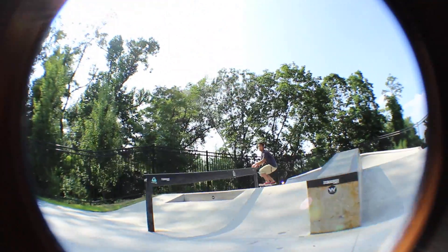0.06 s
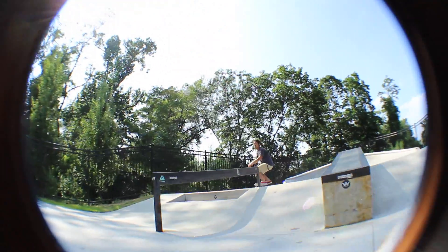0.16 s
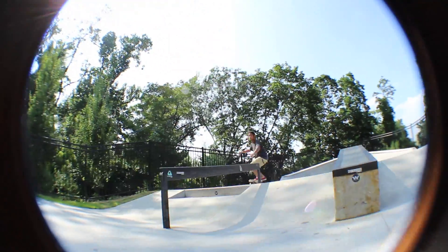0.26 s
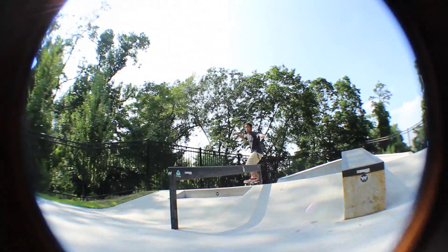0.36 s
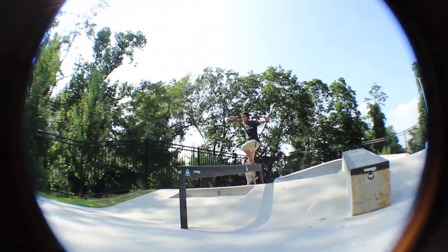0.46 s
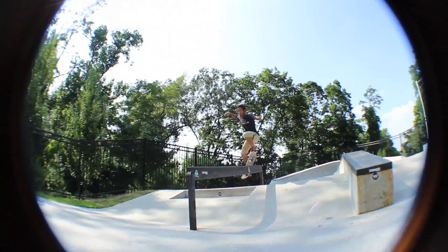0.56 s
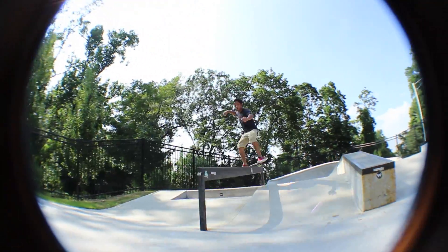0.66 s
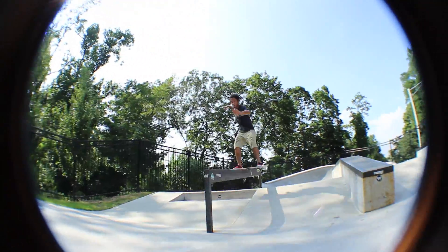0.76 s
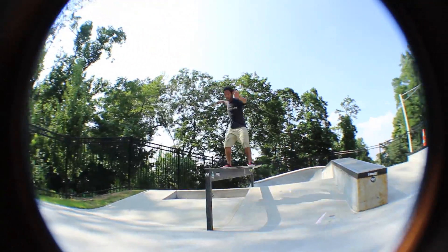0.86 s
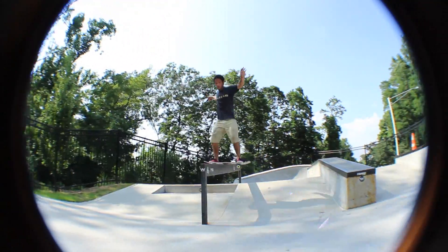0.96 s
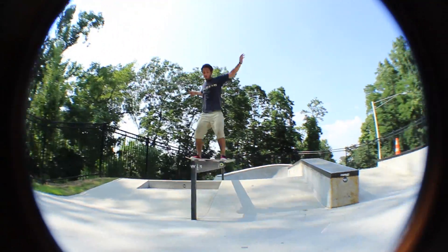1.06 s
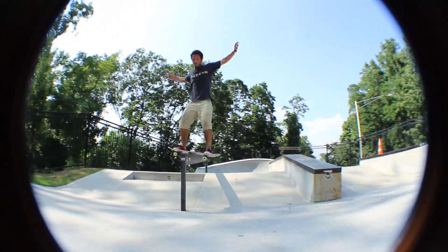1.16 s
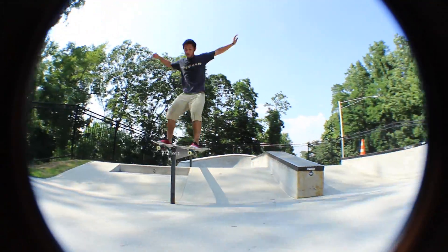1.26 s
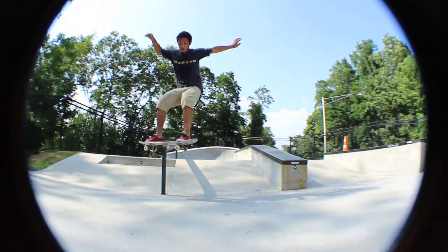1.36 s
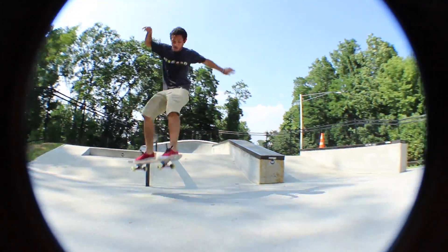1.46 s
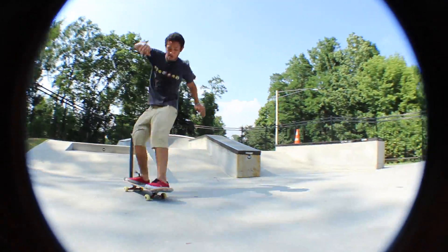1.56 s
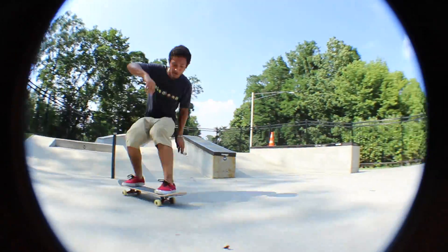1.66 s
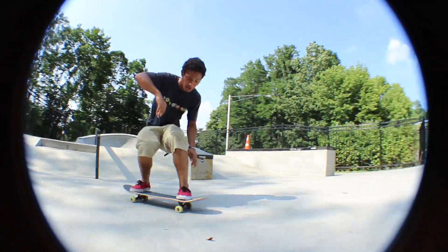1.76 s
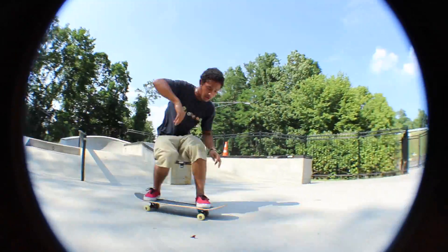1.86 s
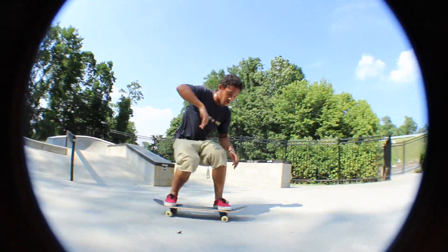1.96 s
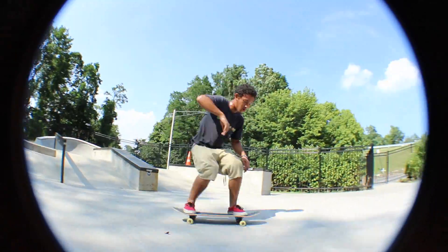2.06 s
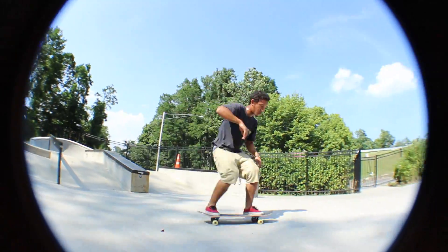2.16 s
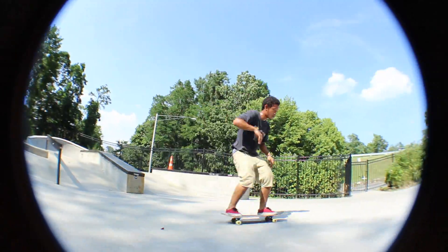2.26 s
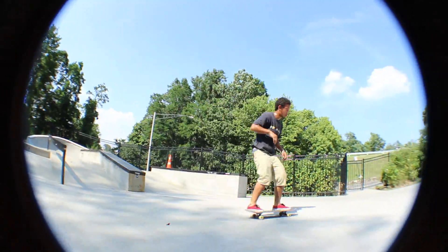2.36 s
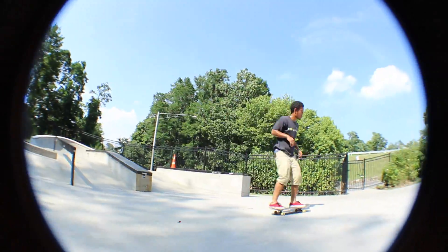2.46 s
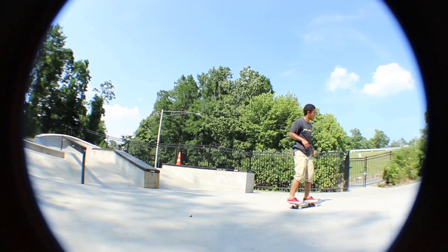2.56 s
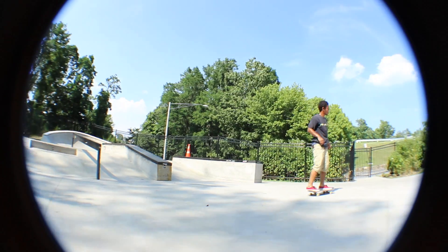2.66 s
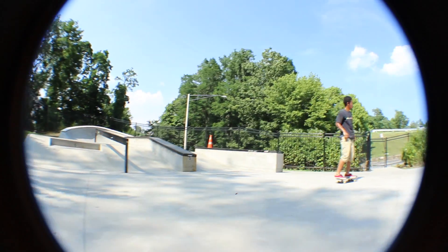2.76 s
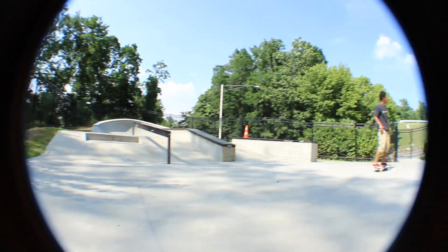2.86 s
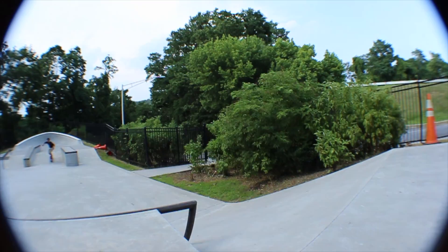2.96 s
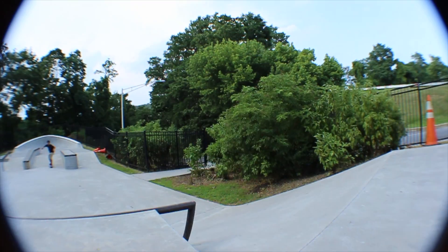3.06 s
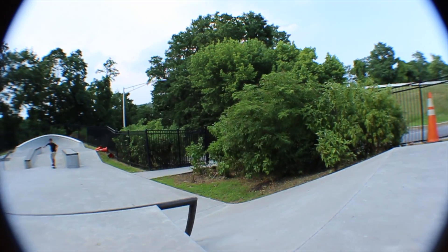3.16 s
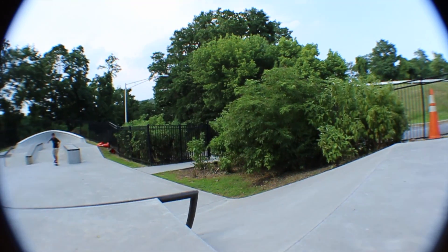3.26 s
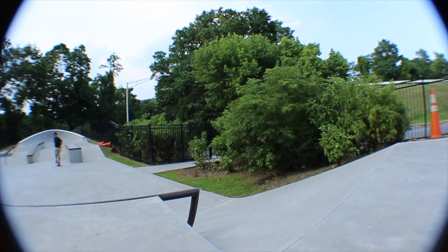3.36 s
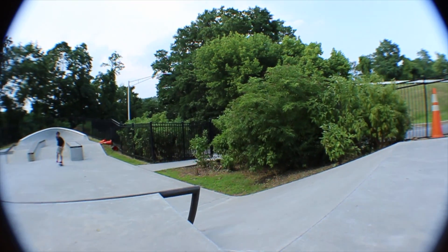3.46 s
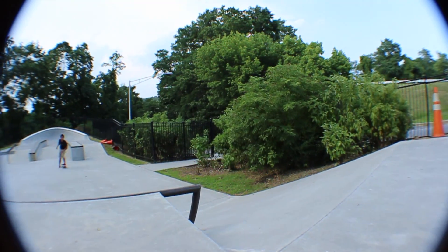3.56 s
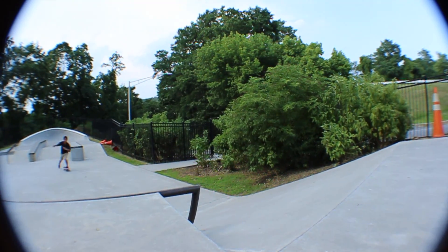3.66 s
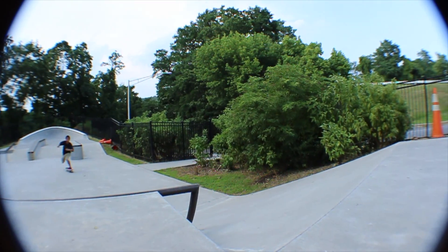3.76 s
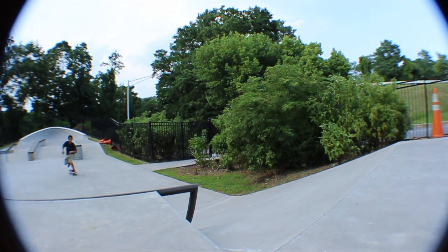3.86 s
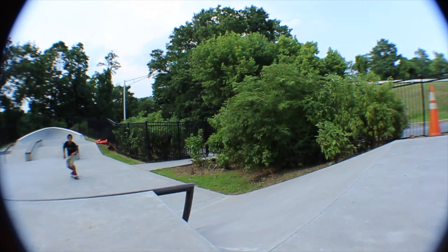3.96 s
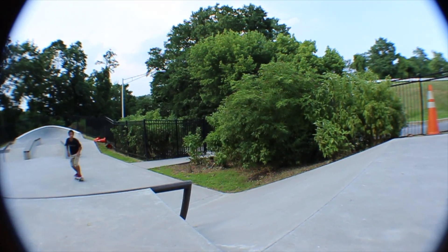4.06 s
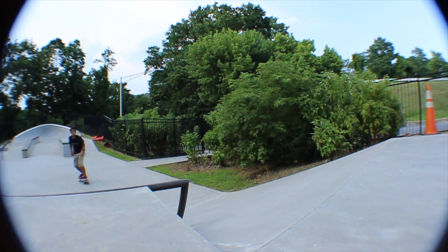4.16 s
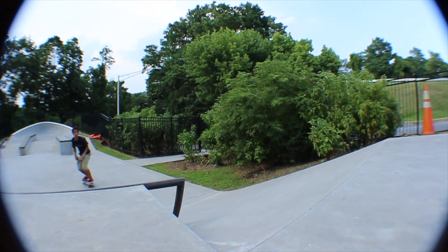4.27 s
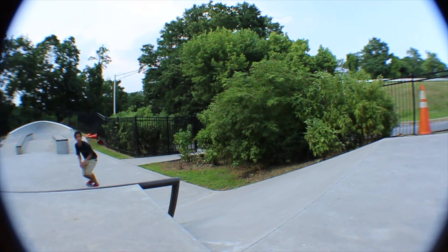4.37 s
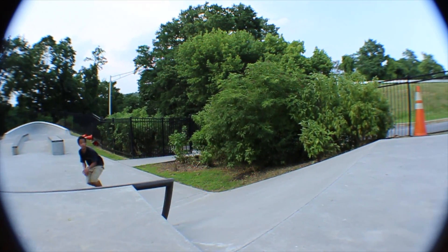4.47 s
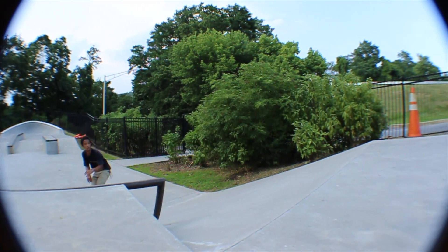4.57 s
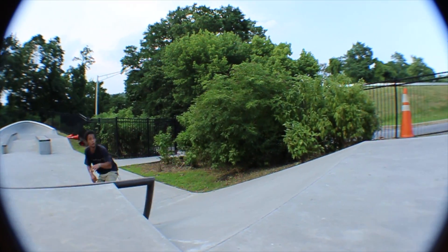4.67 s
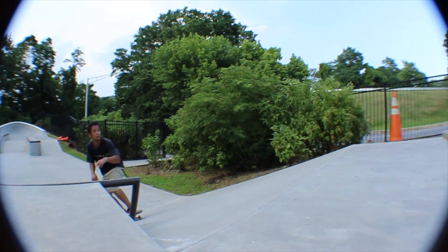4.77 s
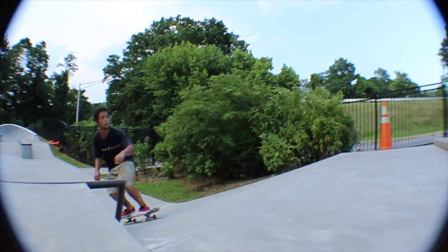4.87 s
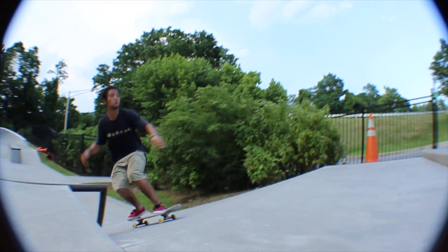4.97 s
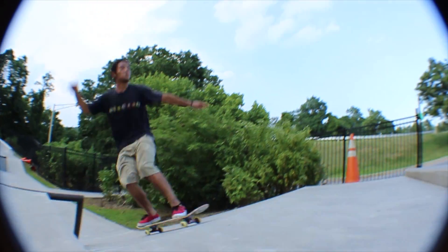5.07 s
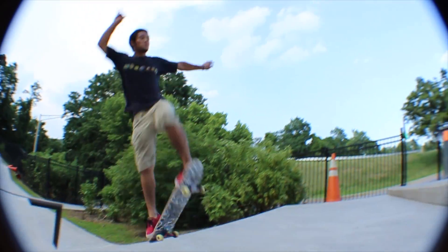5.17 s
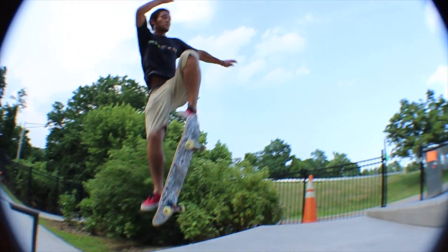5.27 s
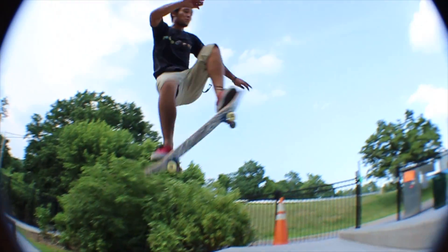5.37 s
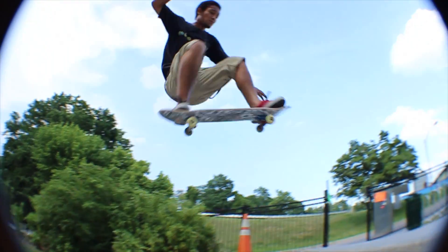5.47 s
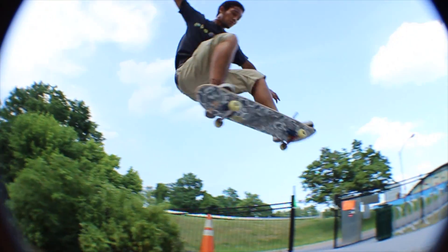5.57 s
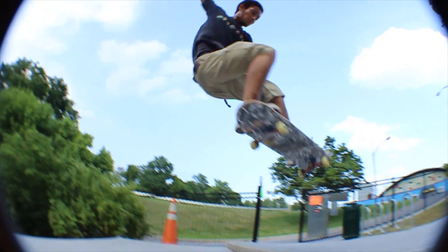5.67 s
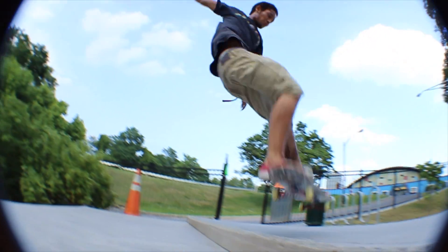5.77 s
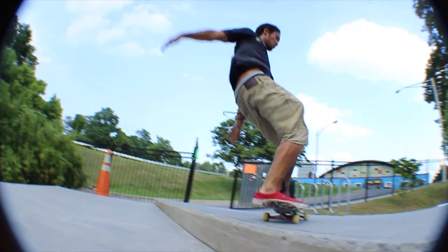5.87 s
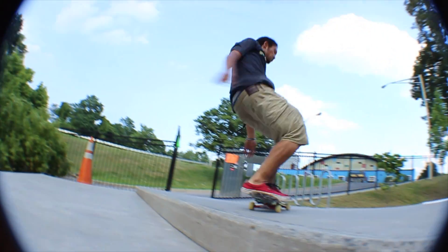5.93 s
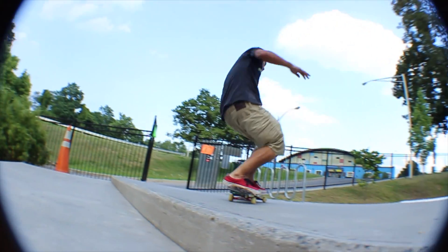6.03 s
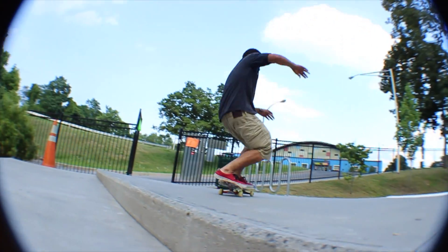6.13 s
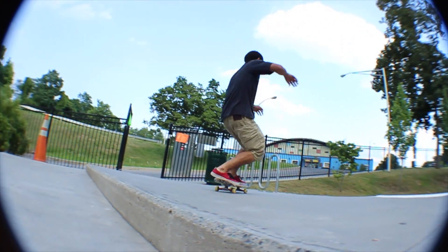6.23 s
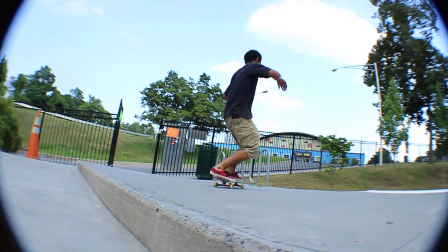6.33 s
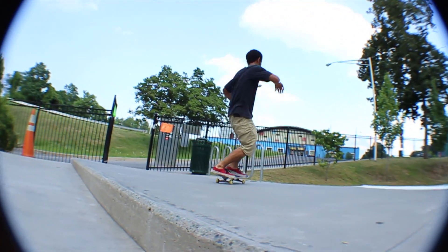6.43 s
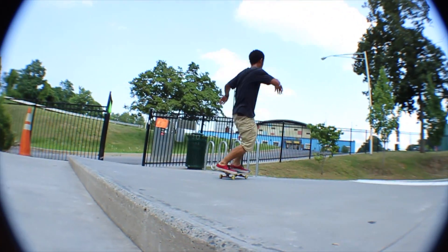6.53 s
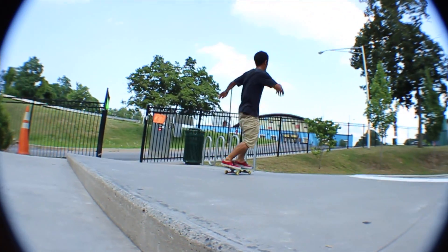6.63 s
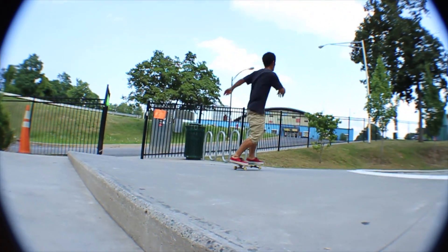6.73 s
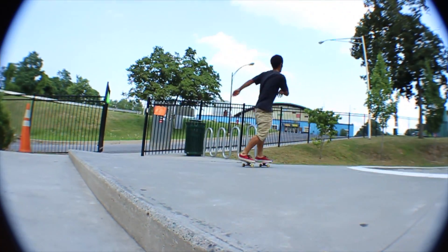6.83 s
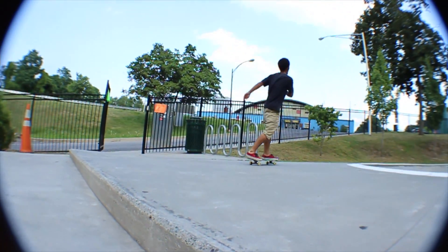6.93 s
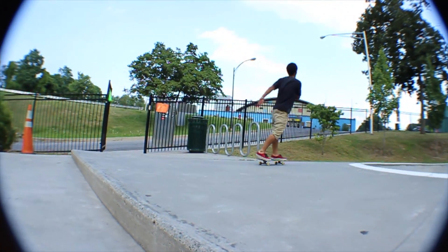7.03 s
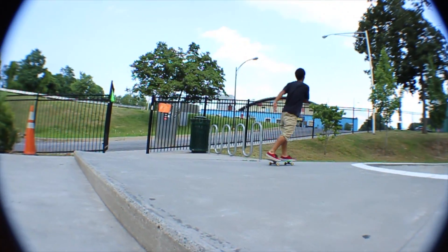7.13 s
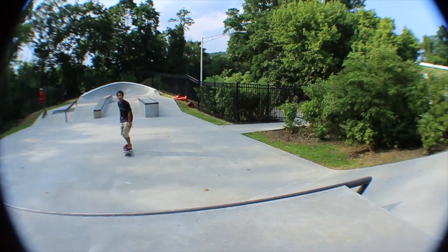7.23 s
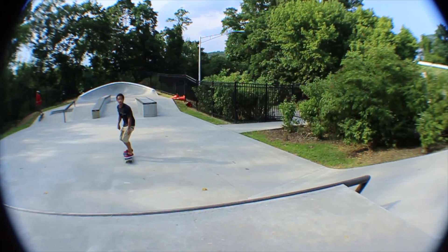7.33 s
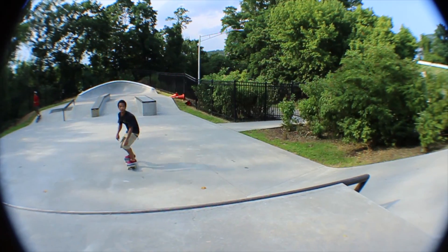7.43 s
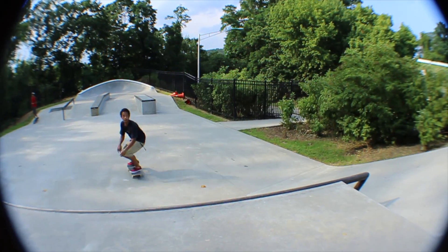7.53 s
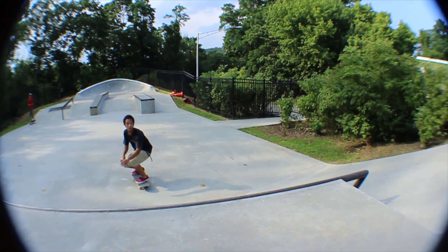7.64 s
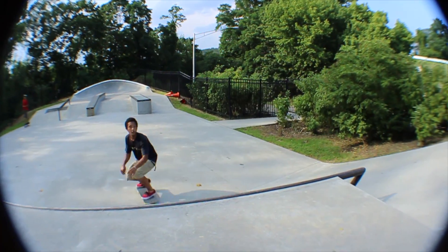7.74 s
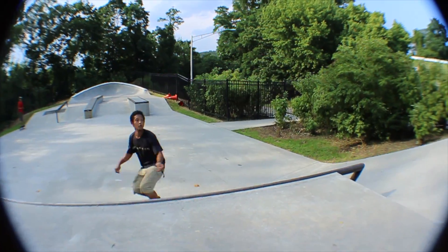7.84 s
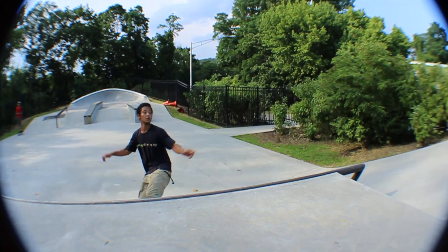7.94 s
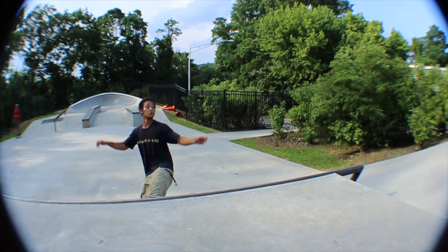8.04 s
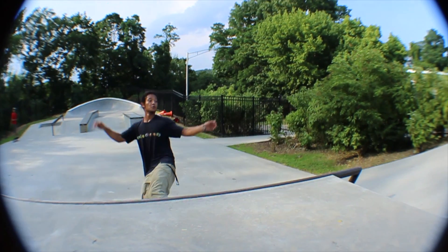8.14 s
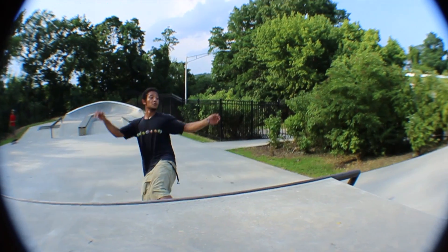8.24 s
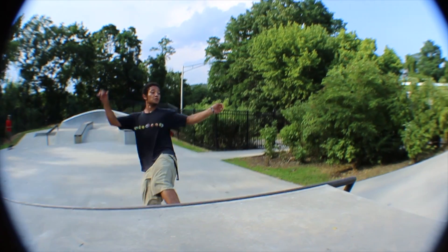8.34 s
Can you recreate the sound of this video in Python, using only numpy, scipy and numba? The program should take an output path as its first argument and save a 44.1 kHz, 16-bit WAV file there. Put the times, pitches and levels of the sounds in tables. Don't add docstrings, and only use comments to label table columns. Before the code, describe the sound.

Close, gritty skateboard rolling over faint low traffic and wind: wooden deck drumming, bearings hissing, small stones ticking. First a pop, rail knock, short metallic scrape and violent landing clack; next a longer approach, sharp pop, airy gap and distorted heavy slam with quiet rolling after; last a brief roll with light knocks. Sudden cuts separate the passes, and automatic gain ducks the background after impacts.

```python
import sys
import numpy as np
from scipy import signal
from scipy.io import wavfile
from scipy.ndimage import uniform_filter1d
from numba import njit

SR = 44100
rng = np.random.default_rng(int(sys.argv[2]) if len(sys.argv) > 2 else 0)


def makeup_ratio(level_db):
    decades = np.asarray(level_db, float) / 20
    return 10 ** decades


def unload_wav(signal):
    wavfile.write(
        sys.argv[1],
        SR,
        np.round(np.clip(np.atleast_2d(signal).T, -1, 1) * 32767).astype(np.int16),
    )


N = 370440

SCENE_CHANGES = [
    2.97,
    7.243,
]

# time in seconds,
# nearness in dB, weight on the deck in dB, bite of the surface in dB.
SLIDE = [
    (0, -32, 2.5, 1.5),
    (.45, -29.5, 3, 3),
    (.54, -27.5, 0.5, 7),
    (.62, -25.5, 0, 6),
    (.8, -29.5, 5.5, 12),
    (1.06, -31, 0.5, 8),
    (1.2, -30, 1.5, 5),
    (1.42, -30, 1.5, 12.5),
    (1.6, -30.5, 2, 12.5),
]
RIDE_AWAY = [
    (1.65, -25, -1.5, 15),
    (2.0, -27, -2, 0.5),
    (2.47, -28.5, -0.5, 2),
    (2.72, -31, 1, 2),
    (2.86, -38.5, 6.5, -3),
    (2.95, -33.5, 4, -12),
]
APPROACH = [
    (2.98, -31, 0, 4.2),
    (3.14, -28, -6.5, 7.6),
    (3.3, -27, 0.5, 1),
    (3.61, -26, -5, 12.8),
    (3.8, -31, 4, 12),
    (4.25, -27, -5, 10),
    (4.49, -29.5, 5, 4.6),
    (5.0, -34.5, 8.5, 23.2),
    (5.22, -27.5, -0.5, 15),
]
JUMP = [
    (5.27, -20, -4, 16),
    (5.4, -30.5, -2, 25.6),
    (5.75, -23, -9, 17.5),
    (5.86, -24.5, -4.5, 15.6),
]
LANDED = [
    (5.909, -30.5, 2.5, 14),
    (6.2, -28, -6.5, -7),
    (6.59, -30, 0.5, 2.5),
    (6.81, -29.5, -5.5, -2.5),
    (6.9, -31, -1, -8),
    (7.235, -35, -1.5, -11),
]
RUN_UP = [
    (7.25, -27.5, -2.5, 10),
    (7.39, -29.5, -12, 13),
    (7.63, -27.5, -0.5, 13),
    (7.8, -30.5, 3.5, 10.6),
    (7.9, -35, 5, 2.8),
]

# start in seconds, deck ring in Hz,
# wheel ring in Hz, bearing ring in Hz.
STANCES = [
    (0, 512, 1140, 3730),
    (.56, 653, 1280, 3900),
    (1.15, 572, 1165, 3950),
    (1.62, 594, 1410, 3760),
    (2.97, 688, 1130, 4200),
    (3.9, 584, 1180, 4100),
    (5.25, 660, 1350, 3630),
    (5.88, 663, 1370, 3730),
    (7.25, 530, 1346, 4270),
    (7.5, 508, 1276, 5280),
]

# centre in Hz, width in Hz, level in dB.
WHEELS = [
    (909, 394, 5),
    (1200, 180, 3),
    (1550, 604, 5),
    (1870, 2200, -9),
]
# centre in Hz, width in Hz, level in dB.
GRIT = [
    (7340, 8000, 15),
    (11400, 7800, 16),
    (13280, 7800, 13),
    (16270, 1900, -1),
]

# start in seconds, peak in dB, ring in Hz,
# crack in dB, decay by 60 dB in seconds.
SNAPS = [
    (0.5564, -16, 3900, 0, 0.009),
    (0.5575, -15.5, 900, -3, 0.027),
    (0.7558, -19, 2260, 2, 0.009),
    (0.7568, -16, 1000, -7, 0.018),
    (0.757, -17, 650, -10, 0.022),
    (1.6062, -7, 1000, -0.5, 0.026),
    (1.611, -17, 1900, -6.5, 0.04),
    (1.607, -8, 620, -20, 0.035),
]
SLAMS = [
    (5.2385, -11.5, 1144, 1.5, 0.026),
    (5.87, -7, 2640, -3, 0.0051),
    (5.8712, -1.5, 650, -15.5, 0.034),
    (5.8765, -8, 564, -5.5, 0.025),
]
# start in seconds, peak in dB, ring in Hz,
# crack in dB, decay by 60 dB in seconds.
KNOCKS = [(0.713, -31, 1880, -23.5, 0.023), (0.774, -22.5, 654, -10, 0.061), (1.619, -11, 1500, -6, 0.01),
          (1.626, -9, 1304, -14, 0.011), (1.6415, -21, 1400, 2, 0.016), (1.643, -22, 900, -8, 0.022),
          (1.6495, -27, 950, -10, 0.012), (1.613, -12, 800, -8, .02), (1.629, -21, 2900, -10, .016),
          (3.1522, -13, 900, -30, 0.011), (3.2042, -12, 1040, -32, 0.014), (4.745, -14, 1160, -38, 0.031),
          (5.0705, -13.5, 660, -22, 0.027), (5.123, -15.5, 673, -10, 0.018), (5.135, -21, 1000, -10, 0.03),
          (5.132, -19, 1500, -6, 0.03), (5.2405, -15, 5090, -20, 0.03), (5.883, -4, 513, -8, 0.0048),
          (5.873, -8, 1150, -15, 0.025), (5.886, -16, 638, -6.5, 0.015), (6.3322, -24, 1550, -20, 0.02),
          (6.1245, -30, 1650, -20, 0.014), (6.217, -30, 1400, -25, 0.015), (6.252, -34, 1800, -15, .015),
          (6.6535, -16, 1500, -30, 0.023), (6.8332, -9, 1590, -29, 0.019),
          (6.8372, -14.5, 1250, -30, 0.036), (6.9025, -20, 1640, -25, 0.026),
          (7.364, -16.5, 1260, -26, 0.049), (7.448, -20, 494, -35.5, 0.049), (7.856, -17, 750, -20, 0.04),
          (7.858, -19, 1250, -12, 0.03), (7.795, -17, 800, -20, .02), (7.915, -15, 493, -32, 0.035),
          (7.9152, -13, 1250, -28, 0.027), (7.92, -17, 1280, -25, 0.012), (0.751, -28, 3440, -3, 0.03),
          (0.5495, -18, 1420, -25, 0.018), (5.952, -38.5, 1200, -12, 0.04), (6.228, -34.5, 1900, -25, 0.02),
          (7.888, -22, 1110, -30, 0.017), (4.748, -20, 453, -30, 0.031), (3.1548, -10, 1100, -35, 0.014),
          (5.244, -14.5, 1350, -12, 0.033)]
# pitch in Hz, level in dB, decay by 60 dB in seconds.
RAIL = [
    (345, -6, 1.5),
    (646, 0, 2),
    (975, -8, .6),
    (1740, -8, .4),
    (2300, -11, .6),
    (2930, -10, .33),
    (3135, -4, .25),
    (3975, -3, .25),
]
# start in seconds, peak in dB, bright click in Hz, wheel ring in dB.
STONES = [(.5566, -12, 11500, -20), (.5605, -28, 6000, -20), (.7562, -21, 7000, -20), (1.166, -32, 3800, 2),
          (1.395, -25, 4000, 2), (1.402, -23, 6000, 3), (2.9725, -40, 11900, -20), (3.095, -40, 4000, -6),
          (3.1515, -32, 5000, -15.5), (3.17, -44, 11000, -20), (3.2055, -41, 6000, 0),
          (3.649, -22, 3500, 4.5), (4.751, -36, 5000, 5), (5.1243, -18, 16500, -8), (5.134, -26, 16000, -5),
          (5.1246, -27, 7000, 0), (5.138, -26, 9000, 3), (5.158, -38, 7000, -5), (5.214, -35, 8000, -10),
          (5.221, -35, 9000, -10), (6.837, -33, 9000, -10), (5.896, -40, 10000, -10),
          (6.1245, -43, 8000, 0), (6.2165, -53, 9000, 5), (4.822, -36, 10000, -10),
          (6.8335, -24, 4600, -10), (6.251, -48, 7000, 5), (6.263, -49, 8500, 5), (6.289, -47, 10000, 12),
          (6.3322, -44, 13000, 16), (6.338, -43, 15000, 5), (6.402, -44, 13000, 0), (6.556, -42, 8000, 0),
          (6.566, -34, 9000, 7), (6.611, -38, 13000, -6), (6.653, -29, 8000, 10), (6.683, -34, 7000, -2),
          (6.6996, -34, 7000, -2), (6.662, -37, 10000, 0), (6.54, -42, 12000, 0), (6.46, -42, 6000, 0),
          (6.718, -35, 8000, 0), (6.768, -36, 6500, 0), (6.8328, -19.5, 6500, -7), (6.842, -33, 11000, 2),
          (6.9024, -33, 10000, 9), (7.156, -32, 9000, 3), (7.855, -30, 7000, 0), (7.9155, -37, 5500, -3),
          (1.6203, -12, 9050, -4), (1.628, -26, 8000, 0), (1.6418, -21, 6500, -6)]

# start in seconds, end in seconds, pitch in Hz, level in dB.
HUMS = [(3.62, 3.92, 334, -35.5), (3.38, 3.55, 340, -36), (4.55, 4.7, 1140, -33), (4.55, 4.72, 1500, -36),
        (4.8, 4.86, 700, -31), (4.9, 5.03, 760, -35), (3.9, 4.35, 330, -40), (4.83, 5.06, 530, -31),
        (3.65, 4.29, 606, -30.5), (4.4, 4.56, 590, -31), (4.54, 4.78, 520, -31), (4.44, 4.78, 1159, -30.5),
        (4.2, 4.36, 1520, -35), (4.95, 5.15, 690, -39), (5.68, 5.83, 980, -38), (7.22, 7.3, 455, -34),
        (7.42, 7.6, 505, -32), (7.54, 7.93, 504.7, -28), (7.723, 7.87, 1152, -29.5), (7.3, 7, 10000, -66)]
# start in seconds, end in seconds, pitch in Hz, level in dB.
RASPS = [(.1, .56, 3900, -54), (.57, .66, 3600, -49), (1.2, 1.45, 3900, -51), (1.46, 1.61, 3650, -46),
         (2.97, 3.14, 1750, -37), (1.72, 2.3, 1900, -54), (2.1, 2.8, 1900, -44), (3.452, 3.72, 1790, -36),
         (3.448, 5.1, 5420, -47.5), (6.243, 6.83, 1550, -46), (7.23, 7.453, 5750, -44),
         (7.4, 7.83, 5440, -42), (7.62, 7.9, 763, -31)]
# start in seconds, end in seconds, centre in Hz, level in dB.
SCRAPES = [(.76, .92, 2300, -43), (.78, .95, 3200, -50), (.565, .63, 5500, -54), (.76, .79, 4000, -36.5),
           (4.16, 4.37, 1700, -31.5), (2.97, 3.15, 1050, -36), (5.08, 5.26, 5200, -52),
           (1.15, 1.6, 9400, -53), (1.2, 1.604, 1810, -37.5), (4.25, 4.7, 216, -33.5),
           (4.98, 5.17, 212, -29.5), (5.45, 5.58, 1490, -41.5), (5.66, 5.92, 1550, -33.5),
           (6.24, 6.85, 3260, -53), (7.29, 7.47, 1870, -28.5), (7.5, 7.8, 189, -32.5),
           (5.28, 5.62, 300, -48), (5.74, 5.88, 1800, -34), (1.645, 1.71, 2000, -50),
           (1.645, 1.7, 3200, -54), (5.885, 5.94, 3000, -48), (5.885, 5.93, 6000, -56),
           (6.24, 6.45, 2700, -52), (1.08, 1.61, 12500, -56), (1.1, 1.61, 7700, -54),
           (4.5, 4.75, 1350, -36)]
# start in seconds,
# end in seconds, first pitch in Hz, last pitch in Hz, level in dB.
SWEEPS = [(4.5, 5.58, 3500, 3600, -49.5), (5.56, 5.78, 3500, 3900, -44), (5.7, 5.91, 3750, 4200, -40),
          (5.42, 5.62, 2500, 2300, -45), (5.58, 5.76, 1800, 2000, -39), (5.72, 5.9, 1950, 2300, -33),
          (5.28, 5.45, 2300, 2400, -49), (1.13, 1.5, 3750, 3900, -48), (5.55, 5.9, 6200, 6460, -49.5),
          (5.7, 5.9, 4500, 4700, -50), (1.1, 1.52, 6400, 6600, -50.5), (1.5, 1.62, 6200, 6300, -48.5),
          (1.1, 1.5, 9100, 9300, -55), (1.42, 1.62, 9400, 11000, -54), (.98, 1.2, 13900, 13600, -66),
          (0.95, 1.62, 15000, 15600, -62), (4.02, 4.36, 8000, 8100, -50.5), (2.97, 3.17, 11500, 11700, -67),
          (2.96, 3.17, 4300, 4600, -51), (4.54, 4.72, 1480, 1490, -34), (4.78, 4.9, 690, 740, -29.5),
          (4.88, 5.06, 620, 534, -29), (7.78, 7.95, 5300, 5300, -45), (6.22, 6.85, 3900, 3740, -57),
          (6.45, 6.85, 6100, 6400, -58)]
# ring in Hz, width in Hz, level in dB.
BEARING_RATTLE = [
    (6500, 1800, -6),
    (10000, 1400, 4),
    (14800, 2500, -3.5),
]

# start in seconds, peak in dB, centre in Hz, length in seconds.
LOW_THUMPS = [(2.522, -31, 127, 0.037), (2.685, -22.5, 323, 0.023), (2.732, -18, 215, 0.019),
              (2.741, -18, 240, 0.023), (2.757, -11.5, 245, 0.027), (2.776, -12.5, 280, 0.021),
              (2.79, -21, 275, 0.034), (2.797, -12.5, 144, 0.0317), (2.809, -18, 320, 0.018),
              (2.765, -20, 380, .03), (2.815, -20, 380, .02), (5.872, -14, 290, .025), (2.5, -24.5, 55, 0.114),
              (2.63, -29, 63.7, .12), (2.74, -19.5, 79, 0.11), (5.864, -14, 280, 0.035),
              (5.862, -22.5, 90, .028), (1.603, -16.5, 330, .025), (1.606, -14, 750, .016)]
# centre in Hz, width in Hz, level in dB.
RUMBLE = [
    (27.9, 45, -23.5),
    (70, 65, -8.5),
    (136.6, 86, 1.5),
    (195, 121, 1.5),
]
# time in seconds, level in dB.
BREEZE = [(0, 3.5), (.3, 0.5), (1.1, 0), (1.9, -2), (2.3, 0.5), (2.95, 3.5), (3.0, -0.5), (4.8, -0.5),
          (5.3, -3.5), (5.7, 2.5), (6.1, 0), (6.5, 1), (7.2, -0.5), (7.3, -0.5), (7.9, -6)]
# start in seconds, depth in dB.
DUCKS = [(0.567, 13.5), (.77, 15), (1.622, 25.5), (2.82, 3), (3.165, 7.5), (3.21, 10), (4.76, 4.5),
         (5.15, 4.5), (5.247, 20.5), (5.885, 23.5), (6.845, 7), (6.91, 6), (7.92, 11)]


def level(x, db=0):
    return x * makeup_ratio(db) / np.sqrt(np.mean(x ** 2) + 1e-30)


def unit_peak(x):
    return x / np.abs(x).max()


@njit
def svf(x, hz, width):
    y, b, l = np.empty(len(x)), 0., 0.
    for i in range(len(x)):
        g, k = np.tan(np.pi * hz[i] / SR), width / hz[i]
        v = (b + g * (x[i] - l)) / (1 + g * (g + k))
        b, l, y[i] = 2 * v - b, l + 2 * g * v, k * v
    return y


def band(x, hz, width):
    return svf(x, np.clip(hz, 20, .45 * SR) * np.ones(len(x)), float(width))


def steep(x, hz, width):
    return level(band(band(x, hz, 1.68 * width), hz, 1.68 * width))


def body(x, modes):
    return level(sum((-1) ** k * makeup_ratio(db) * steep(x, hz, width) for k, (hz, width, db) in enumerate(modes)))


def walk(rate):
    k = int(SR / rate)
    held = np.repeat(rng.standard_normal(N // k + 1), k)
    return 1.63 * uniform_filter1d(uniform_filter1d(held, k), k)[:N]


def grit(scatter_db, flicker_db, rate):
    size = np.minimum(rng.exponential(size=N), 5.5)
    return rng.standard_normal(N) * makeup_ratio(scatter_db * size + flicker_db * walk(rate))


def add(out, s, x):
    i = int(s * SR)
    out[i:i + len(x)] += x[:N - i]


def curves(rows):
    s, *columns = np.transpose(rows)
    return [np.interp(np.arange(N) / SR, s, c) for c in columns]


def motion():
    passes = [curves([*SLIDE, *RIDE_AWAY]), curves([*APPROACH, *JUMP, *LANDED]), curves(RUN_UP)]
    return np.choose(np.searchsorted(SCENE_CHANGES, np.arange(N) / SR), passes)


def stance():
    glide_s, drift = 0.04, 0.055
    s, *rings = np.transpose(STANCES)
    now = np.clip(np.searchsorted(s, np.arange(N) / SR) - 1, 0, None)
    return [uniform_filter1d(hz[now], int(glide_s * SR)) * (1 + drift * walk(5)) for hz in rings]


def rolling(near_db, weight_db, bite_db):
    deck_hz, wheel_hz, bearing_hz = stance()
    jolts = makeup_ratio(0.32 * walk(40))
    bumps = grit(scatter_db=1.0, flicker_db=-1.5, rate=19)

    wood = [(.58 * deck_hz, 50, -7), (deck_hz * (1 + .03 * walk(12)), 80, 0)]
    drum = makeup_ratio(-6) * body(bumps, wood)
    deck = drum + body(grit(scatter_db=2.5, flicker_db=1.5, rate=31), [(566, 427, 0)])

    tread = grit(scatter_db=3.0, flicker_db=1.0, rate=39)
    wheels = body(tread, WHEELS) + makeup_ratio(-7.5) * body(bumps, [(wheel_hz, 180, 0)])
    wheels = signal.sosfilt(signal.butter(6, 2110, fs=SR, output="sos"), wheels)

    hiss = grit(scatter_db=3.0, flicker_db=1.0, rate=130)
    bearings = makeup_ratio(-8.0) * body(tread, [(bearing_hz, 800, 0)])
    bearings = bearings + body(hiss, [(2777, 1910, 11.5), (5550, 7500, -25.5)])
    sand = body(grit(scatter_db=3.5, flicker_db=1.0, rate=27), GRIT)

    board = makeup_ratio(near_db + weight_db) * level(deck) + makeup_ratio(near_db) * level(wheels)
    board = board + makeup_ratio(near_db - 13.5 + 0.36 * bite_db) * level(bearings)
    return jolts * (board + makeup_ratio(near_db - 31.5 + bite_db) * sand)


def blows(table, over_db, thud_db, clack=0.16, rattle=1.1):
    out, t = np.zeros(N), np.arange(SR // 8) / SR
    for s, db, hz, crack_db, t60 in table:
        noise = rng.standard_normal((4, len(t)))
        fall = np.minimum(t / .0004, 1) * makeup_ratio(-60 * (t / max(t60, .005)) ** 1.5)
        ring = np.sin(2 * np.pi * hz * t) + rattle * steep(noise[0], 1.05 * hz, .4 * hz)
        ring = fall * (ring - clack * steep(noise[0], hz + 1000, 1300))
        crack = fall ** 2.7 * (steep(noise[1], 3090, 1900) + makeup_ratio(-12.5) * steep(noise[1], 9000, 7000))
        thud = fall ** 1.7 * steep(noise[2], 300, 210)
        echo = makeup_ratio(-28.5 - 60 * t / 0.049) * steep(noise[3], min(3.7 * hz, 4200), 2000)
        hit = unit_peak(ring) + makeup_ratio(crack_db) * unit_peak(crack) + makeup_ratio(thud_db) * unit_peak(thud) + echo
        add(out, s, makeup_ratio(db + over_db) * hit)
    return out


def board_hits():
    snaps = blows(SNAPS, over_db=9, thud_db=-16, clack=0.53)
    slams = blows(SLAMS, over_db=9, thud_db=-5.5)
    return snaps + slams + blows(KNOCKS, over_db=2, thud_db=-15.5, rattle=.7)


def rail():
    start_s, length_s, recovery_db_per_s = .757, .48, 26
    out, t = np.zeros(N), np.arange(SR) / SR
    lift = makeup_ratio(recovery_db_per_s * t) * np.clip((length_s - t) / 0.11, 0, 1)
    for hz, db, t60 in RAIL:
        scrape = makeup_ratio(1.5 * walk(60)[:SR])
        decay = makeup_ratio(-34.5 + db - 60 * t / min(t60, 2))
        tone = np.sin(2 * np.pi * (hz * t + rng.random()))
        add(out, start_s, scrape * lift * decay * tone)
    return out


def stones():
    out, t = np.zeros(N), np.arange(600) / SR
    for s, db, hz, ring_db in STONES:
        noise = rng.standard_normal((2, len(t)))
        bright = band(noise[0] * np.exp(-t / 0.00073), hz, .8 * hz)
        ring = steep(noise[1], 1650, 370) * np.exp(-t / .003)
        add(out, s, makeup_ratio(db) * (unit_peak(bright) + makeup_ratio(ring_db) * unit_peak(ring)))
    return out


def drones():
    out, bumps = np.zeros(N), grit(scatter_db=1.5, flicker_db=2.0, rate=24)
    for table, sharpness in ((HUMS, 16), (RASPS, 9), (SCRAPES, 3.8)):
        for start, end, hz, db in table:
            piece = bumps[int(start * SR):int(end * SR)]
            swell = signal.windows.tukey(len(piece), .6)
            add(out, start, makeup_ratio(db) * steep(piece, hz, hz / sharpness) * swell)
    return out


def sweeps():
    out, bumps = np.zeros(N), grit(scatter_db=1.0, flicker_db=1, rate=26)
    for start, end, from_hz, to_hz, db in SWEEPS:
        piece = bumps[int(start * SR):int(end * SR)]
        hz = np.linspace(from_hz, to_hz, len(piece))
        swell = signal.windows.tukey(len(piece), .5)
        add(out, start, makeup_ratio(db) * steep(piece, hz, from_hz / 9.8) * swell)
    return out


def bearing_rattle():
    from_s, to_s, clicks_per_s = 6.04, 6.95, 97
    t = np.arange(N) / SR
    clicks = (rng.random(N) < clicks_per_s / SR) * makeup_ratio(4 * np.minimum(rng.exponential(size=N), 3))
    puffs = signal.lfilter([1], [1, -np.exp(-1 / (.002 * SR))], clicks) + .6
    on = np.clip(np.minimum(t - from_s, to_s - t) / .05, 0, 1)
    return on * makeup_ratio(-58) * body(puffs * rng.standard_normal(N), BEARING_RATTLE)


def low_thumps():
    out, t = np.zeros(N), np.arange(SR // 8) / SR
    for s, db, hz, length in LOW_THUMPS:
        puff = level(band(band(rng.standard_normal(len(t)), hz, 0.88 * hz), hz, 0.57 * hz))
        puff = puff * np.sin(np.pi * np.clip(t / length, 0, 1))
        add(out, s, makeup_ratio(db) * unit_peak(puff))
    return out


def rumble(weight_db):
    squeeze_db = 0.35 * np.maximum(weight_db, 0)
    gain_db = -30.5 + curves(BREEZE)[0] - squeeze_db + 0.5 * walk(13)
    return makeup_ratio(gain_db) * body(rng.standard_normal(N), RUMBLE)


def self_noise():
    return makeup_ratio(-68) * steep(rng.standard_normal(N), 12000, 9000)


def ducking():
    drop_s, creep_db_per_s = 0.03, 29
    t = np.arange(N) / SR
    pass_now = np.searchsorted(SCENE_CHANGES, t)
    drops = []
    for s, db in DUCKS:
        same_pass = pass_now == np.searchsorted(SCENE_CHANGES, s)
        depth = np.maximum(db - creep_db_per_s * (t - s), 0)
        drops.append(-np.clip((t - s) / drop_s, 0, 1) * depth * same_pass)
    return np.min(drops, axis=0)


def scene():
    near_db, weight_db, bite_db = motion()
    steady = rolling(near_db, weight_db, bite_db) + bearing_rattle() + rumble(weight_db) + self_noise()
    hits = board_hits() + rail() + stones() + drones() + sweeps()
    return (makeup_ratio(ducking()) * steady + hits + low_thumps())[None]


def roll_off(x):
    return signal.sosfilt(signal.butter(12, 17860, fs=SR, output="sos"), x)


def record(dry):
    ceiling, end_s, fade_s = .43, 7.9465, .004
    mic = signal.sosfilt(signal.butter(2, 35.6, "high", fs=SR, output="sos"), dry)
    flat = np.clip(mic, -ceiling, ceiling)
    dull = signal.sosfiltfilt(signal.ellip(5, .2, 10, 16450, fs=SR, output="sos"), flat)
    fade = np.clip((end_s - np.arange(N) / SR) / fade_s, 0, 1)
    return roll_off(dull * fade)


dry = scene()
out = record(dry)
unload_wav(out)
```